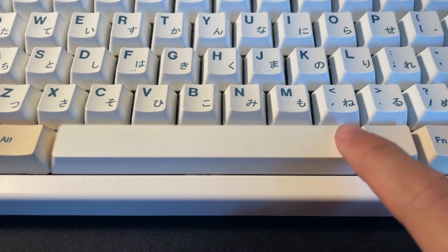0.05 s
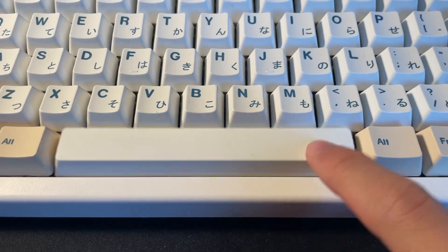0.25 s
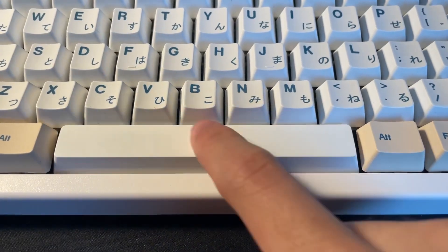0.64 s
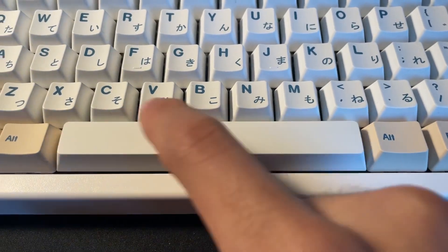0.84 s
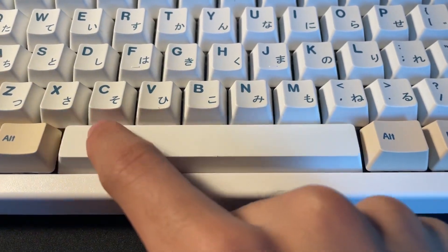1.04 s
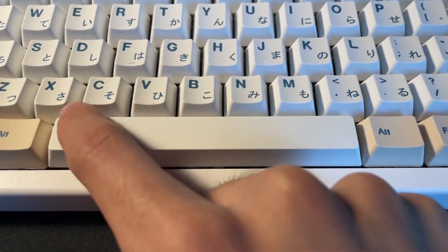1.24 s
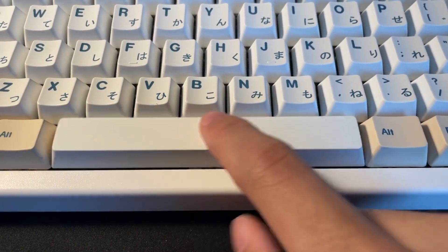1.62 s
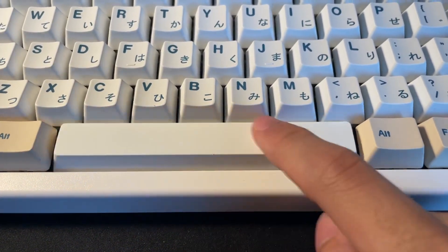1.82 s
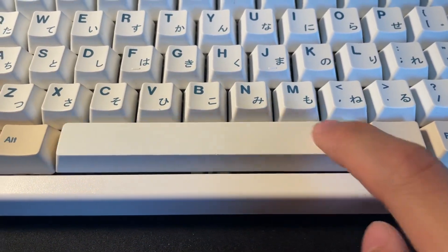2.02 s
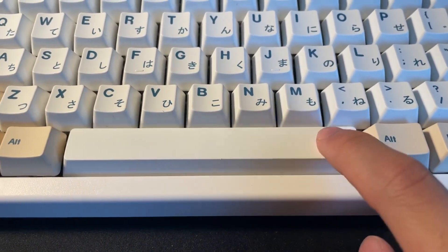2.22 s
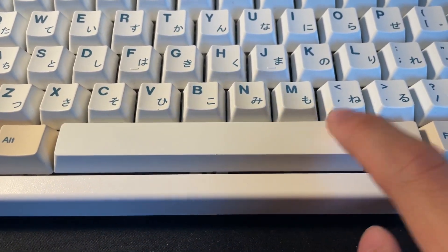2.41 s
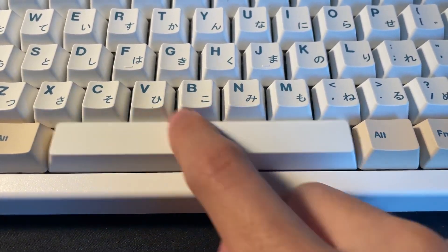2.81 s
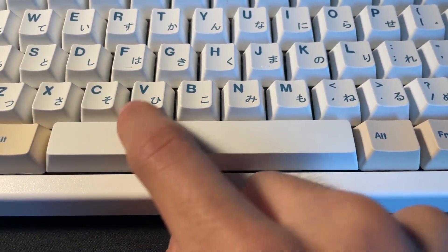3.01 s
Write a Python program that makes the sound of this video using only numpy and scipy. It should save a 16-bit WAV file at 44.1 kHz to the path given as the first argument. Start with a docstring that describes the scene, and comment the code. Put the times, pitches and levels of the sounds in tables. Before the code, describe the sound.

A finger taps a mechanical spacebar in a fast, steady run of sharp clacks and lighter return clicks, the tone shifting slightly. It is heard up close in a small, quiet room, with the desk thudding softly underneath.

```python
"""A finger taps the spacebar of a mechanical keyboard about seven times a second, wandering along the bar.
A faint fingertip touch leads most strokes. The bar then bottoms out with a clack and springs back
with a lighter one. After each clack the case rings briefly, the desk booms and a small room answers.
A faint low rumble runs throughout."""
import sys
import numpy as np
from scipy import signal
from scipy.fft import rfft, irfft
from scipy.io import wavfile

SR = 44100
rng = np.random.default_rng(int(sys.argv[2]) if len(sys.argv) > 2 else 0)


def generate_wav(signal):
    """Clip the signal to [-1, 1] and save it as 16-bit WAV at the path in sys.argv[1]."""
    frames = np.transpose(np.atleast_2d(signal))
    scaled = np.clip(frames, -1, 1) * 32767
    pcm = np.round(scaled).astype(np.int16)
    wavfile.write(sys.argv[1], SR, pcm)


N = 138915
HIT_SAMPLES = 4096

# bar bottoms out: start_s, level_db, upper_mid_db, treble_db
PRESSES = [(0.2203, -29.5, 2.5, -6), (0.3555, -29, 4, -0.5), (0.4902, -32, 1.5, -1.5),
           (0.6216, -36.0, 1, 4), (0.7563, -36.5, 0.5, 3.5), (0.895, -34, 1.0, 3), (1.0259, -34, 1.0, 4.5),
           (1.1704, -36.5, -1, 9.5), (1.4364, -39.5, -0.5, 1.0), (1.5634, -38.5, 0, 2),
           (1.6795, -38.5, 1, 3.5), (1.7924, -34, 1.5, 1), (1.9239, -35, 2, 3.5), (2.063, -35.5, 2, -0.5),
           (2.1983, -33, 3.5, -3), (2.3446, -32.5, 2, -5.5), (2.475, -33.5, 0, -3.0), (2.6158, -39, 0, 0.5),
           (2.7461, -35.0, 0.5, 4.5), (2.886, -35.0, 2, 2.5)]
# bar springs back to its top stop: start_s, level_db, upper_mid_db, treble_db
RELEASES = [(0.1374, -41.5, -5.5, 4.5), (0.2888, -38.5, -6.5, 2.5), (0.431, -39, -4.5, 4),
            (0.5601, -39.5, -7, 6.5), (0.6868, -39, -6.5, 5), (0.8166, -36.5, -2, 5),
            (0.9624, -40, -4.5, 6.5), (1.0975, -37, -2.5, 4), (1.2368, -38.5, -6, 2),
            (1.3119, -44, -4.5, -5), (1.5177, -51.5, -4.5, -0.5), (1.6316, -47, -5.5, 2),
            (1.7431, -42, -5.0, 0), (1.868, -41.5, -4.5, -0.5), (1.9995, -43, -1.5, 2),
            (2.1358, -39.5, -5, 4), (2.267, -38.5, -2, 4), (2.4028, -38.5, -5.5, 5.5),
            (2.5571, -47, -5.5, 3), (2.6907, -42, -5.5, 4), (2.8194, -37.5, -3, 4),
            (2.9798, -44, -7.0, -1.5)]
# bar and plate: pitch_hz, width_hz, gain_db, right_end_change_db
PRESS_MODES = [(330.4, 83, 46.5, -4.5), (511.3, 53, 46.5, -3.5), (583, 102, 44.5, -2), (722, 68, 41.5, 2),
               (1020, 413, 42, 6.5), (1338, 364, 40, 8.5), (1482, 195, 43.5, -3.5),
               (2024, 350, 40.5, -13.5), (2420, 510, 38.5, -1), (3630, 1170, 29.5, 6.5),
               (5330, 2100, 25, 8), (7020, 495, 29.5, 4.5), (9700, 7400, 16, 8.5), (15200, 800, 20.5, 9.5)]


def spacebar():
    """Presses and releases strike the bar in opposite senses; the fingertip adds its touches."""
    # bar and switch on the way back: pitch_hz, width_hz, gain_db
    release_modes = [(340, 64, 42.5), (546, 80, 44), (680, 173, 41.5), (822, 107, 43.5), (1053, 73, 39),
                     (1268, 160, 43.5), (1510, 180, 46), (2463, 770, 42), (3850, 5400, 22),
                     (6010, 590, 27.5), (6920, 230, 22), (10360, 9100, 6.5)]
    down = clacks(PRESSES, PRESS_MODES, rattle=0.27)
    up = clacks(RELEASES, release_modes, rattle=0.45)
    return disperse(down - up + touches())


def clacks(events, modes, rattle, rattle_decay_s=0.003):
    """Hard contacts, each an impulse followed by a little stabiliser chatter."""
    # chatter spectrum: freq_hz, gain_db
    rattle_colour = [(1400, -13), (6000, 9.5)]
    # finger along the bar: time_s, place (-1 left end, 1 right end)
    finger_path = [(.25, 1), (.62, 0.099), (1.2, -0.4), (1.85, 0.039), (2.4, 0.76), (2.65, -0.13),
                   (2.9, -0.1)]
    out, t, f = np.zeros(N), np.arange(HIT_SAMPLES) / SR, freqs(HIT_SAMPLES)
    for start_s, level_db, mid_db, treble_db in events:
        force = rattle * struck(burst(rattle_decay_s, t), amp(curve(rattle_colour, f)))
        force[0] += 1
        tone = amp(curve([(1500, 0), (2100, mid_db), (3400, mid_db), (4800, treble_db)], f))
        place = np.interp(start_s, *np.array(finger_path).T)
        add(out, amp(level_db) * struck(force, resonances(modes, f, place) * tone), start_s)
    return out


def touches(decay_s=0.003):
    """The soft fingertip lands on the loose bar and takes up its slack."""
    # fingertip landings: start_s, level_db
    landings = [(0.071, -48), (0.075, -41), (0.091, -41), (0.207, -37.5), (0.345, -35.5), (0.473, -48.5),
                (0.882, -46), (1.009, -45.5), (1.149, -52.5), (1.391, -56.5), (2.038, -43.5),
                (2.178, -44.5), (2.326, -41.5), (2.456, -40.5), (2.726, -47), (2.868, -45.5)]
    # soft contact spectrum: freq_hz, gain_db
    touch_colour = [(500, -11), (1200, -2.5), (2200, -9), (9000, -5)]
    out, t, f = np.zeros(N), np.arange(HIT_SAMPLES) / SR, freqs(HIT_SAMPLES)
    for start_s, level_db in landings:
        force = burst(decay_s, t)
        gain = resonances(PRESS_MODES, f) * amp(curve(touch_colour, f))
        add(out, amp(level_db) * struck(force, gain), start_s)
    return out


def resonances(modes, f, place=0, scatter_db=1.51, detune=0.012):
    """Gain of steep-sided modes; they vary, as the finger never lands on the same spot."""
    power, f = 0, f + 1
    for hz, width_hz, gain_db, *right_end_db in modes:
        gain_db = gain_db + place * sum(right_end_db) + scatter_db * rng.standard_normal()
        hz = hz * (1 + detune * rng.standard_normal())
        offset = (f / hz - hz / f) * hz / width_hz
        power = power + (amp(gain_db) / (1 + offset ** 2)) ** 2
    return np.sqrt(power)


def struck(force, gain):
    """Force through a minimum-phase body: it responds at once, then rings."""
    size = len(force)
    cepstrum = irfft(np.log(gain + 1e-3), size)
    cepstrum[1:size // 2] *= 2
    cepstrum[size // 2 + 1:] = 0
    return irfft(rfft(force) * np.exp(rfft(cepstrum)), size)


def disperse(x, lag_near_1khz_s=0.0006):
    """Treble leaves the keys at once; the low knock spreads through plate and case later."""
    lag_cycles = lag_near_1khz_s * 1000 * np.log(1 + freqs(N) / 50)
    return irfft(rfft(x) * np.exp(-2j * np.pi * lag_cycles), N)


def direct(bar):
    """The bar heard directly, louder on the left in the mids."""
    # stereo balance: freq_hz, left_minus_right_db
    balance = [(300, -5.5), (550, 3), (1300, 5), (3000, 6.5), (9000, 0)]
    return np.array([colour(bar, [(hz, side * db / 2) for hz, db in balance]) for side in (1, -1)])


def case(bar):
    """The case lingers on a few notes and adds near reflections."""
    # case notes: pitch_hz, width_hz, gain_db
    case_modes = [(506.3, 14, -9.5), (1456, 13, -8.5), (2304, 26, -6)]
    # case ring and near reflections: freq_hz, gain_db
    case_colour = [(440, -28.5), (1500, -10.5), (6000, -10), (8500, -26.5)]
    t = np.arange(SR // 2) / SR
    notes = sum(amp(db) * ring(hz, width_hz, t) for hz, width_hz, db in case_modes)
    reflections = colour(tail(t60_s=0.059, build_s=0.0024), case_colour)
    return signal.fftconvolve(bar[None], notes + reflections, axes=1)[:, :N]


def desk(drive_db=14.5, release_db=-0.5, follow_db_per_db=0.4):
    """Presses push the desk down, releases pull it up; the thump grows more slowly than the clack."""
    # desk and case under the keys: pitch_hz, width_hz, gain_db
    desk_modes = [(64, 7.6, 20), (73.3, 7.7, 18), (103.6, 8.6, 15), (128.94, 3.5, 16.5), (189, 19, 5.5),
                  (225.5, 10, 9.5), (270.6, 49, -2)]
    force, t = np.zeros(N), np.arange(SR // 2) / SR
    for events, gain in (PRESSES, 1), (RELEASES, -amp(release_db)):
        for start_s, level_db, *_ in events:
            add(force, np.array([gain * amp(drive_db + follow_db_per_db * level_db)]), start_s)
    body = sum((-1) ** k * amp(db) * ring(hz, width_hz, t)
               for k, (hz, width_hz, db) in enumerate(desk_modes))
    return signal.fftconvolve(force, body)[:N] * pan(left_minus_right_db=-3.5)


def room():
    """Each clack reverberates, treble dying first; the moving hand makes every decay different."""
    # reverberation spectrum: freq_hz, gain_db
    room_colour = [(100, 38.5), (300, 33.5), (900, 21.5), (2000, 22), (3300, 17), (4500, 14), (6800, 13.5),
                   (8300, 10), (11000, 0.5), (14000, -10)]
    out = np.zeros((2, N))
    for start_s, level_db, _, treble_db in list(PRESSES) + list(RELEASES):
        low = colour(tail(t60_s=0.42, build_s=0.003), [(2000, 0), (3000, -3), (6000, -20)])
        high = colour(tail(t60_s=0.28, build_s=0.003), [(1500, -20), (3000, -3), (4500, 0)])
        decay = low + amp(treble_db / 2) * high
        add(out, amp(level_db) * decay[:, :SR // 3], start_s)
    return colour(out, room_colour)


def rumble(rms_db=-55):
    """Faint low background of the room."""
    # noise spectrum: freq_hz, relative_db
    rumble_colour = [(22, -39.5), (62, 1.5), (120, -18.5), (220, -10.5), (450, -40), (15000, -57)]
    noise = colour(widen(rng.standard_normal((2, N))), rumble_colour)
    return noise / noise.std() * amp(rms_db)


def tail(t60_s, build_s):
    """Diffuse stereo noise that swells and dies away."""
    t = np.arange(SR // 2) / SR
    envelope = np.exp(-np.log(1000) * t / t60_s) * (1 - np.exp(-t / build_s))
    noise = rng.standard_normal((2, len(t))) * envelope
    return widen(noise / np.linalg.norm(noise, axis=1, keepdims=True))


def widen(pair):
    """Two unrelated noises, as mid and side, become left and right."""
    # room width: freq_hz, side_to_mid_ratio
    room_spread = [(100, 0.14), (4500, 0.99), (7000, 0.14)]
    size = pair.shape[-1]
    spread = curve(room_spread, freqs(size))
    mid, side = rfft(pair) / np.sqrt(1 + spread ** 2)
    return irfft(np.array([mid + spread * side, mid - spread * side]), size)


def ring(hz, width_hz, t):
    """Damped mode with gain 1 at its centre."""
    return 2 * np.pi * width_hz / SR * np.exp(-np.pi * width_hz * t) * np.sin(2 * np.pi * hz * t)


def burst(decay_s, t):
    """Dying noise of unit energy."""
    noise = rng.standard_normal(len(t)) * np.exp(-t / decay_s)
    return noise / np.linalg.norm(noise)


def colour(x, points):
    """Filter by (freq_hz, gain_db) points."""
    size = x.shape[-1]
    return irfft(rfft(x) * amp(curve(points, freqs(size))), size)


def curve(points, hz):
    """Interpolate (freq_hz, value) points on a log-frequency axis."""
    points_hz, values = np.array(points, float).T
    return np.interp(np.log(hz + 1), np.log(points_hz), values)


def freqs(size):
    return np.arange(size // 2 + 1) * SR / size


def amp(db):
    return 10 ** (np.asarray(db) / 20)


def pan(left_minus_right_db):
    return amp(np.array([[1], [-1]]) * left_minus_right_db / 2)


def add(out, x, start_s):
    i = max(int(start_s * SR), 0)
    out[..., i:i + x.shape[-1]] += x[..., :N - i]


def scene():
    """Spacebar with case, desk, room and rumble."""
    bar = spacebar()
    return direct(bar) + case(bar) + desk() + room() + rumble()


def record(dry):
    """Two close microphones hear the keyboard slightly out of step; the top is cut."""
    # phase between the microphones: freq_hz, left_lead_rad
    mic_phase = [(100, 0.43), (1000, 0.39), (2200, 1.19), (3200, 1.6), (6000, 1), (8000, -2.5),
                 (11500, -7.5), (15500, -9)]
    right = irfft(rfft(dry[1]) * np.exp(-1j * curve(mic_phase, freqs(N))), N)
    top_hz = 16500
    top_cut = signal.ellip(8, 0.2, 70, top_hz, fs=SR, output="sos")
    return signal.sosfilt(top_cut, np.array([dry[0], right]))


dry = scene()
out = record(dry)
generate_wav(out)
```